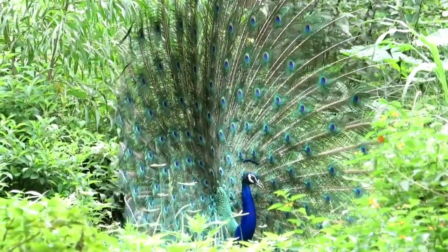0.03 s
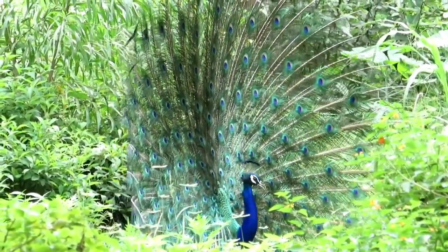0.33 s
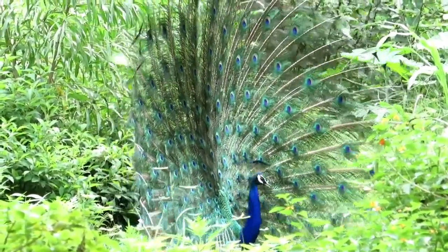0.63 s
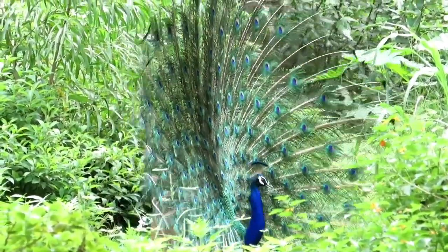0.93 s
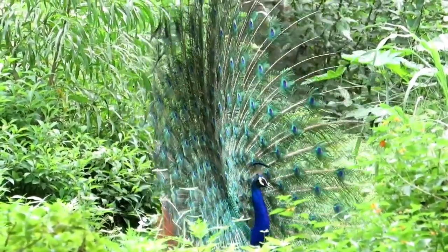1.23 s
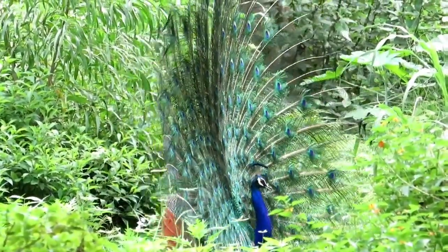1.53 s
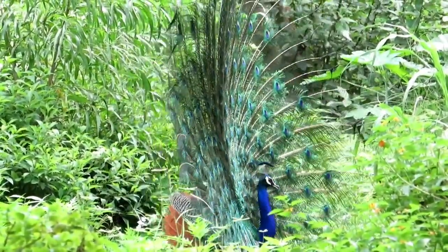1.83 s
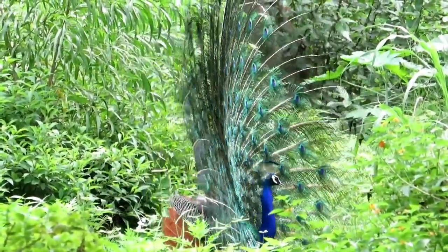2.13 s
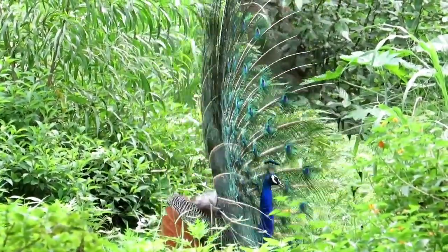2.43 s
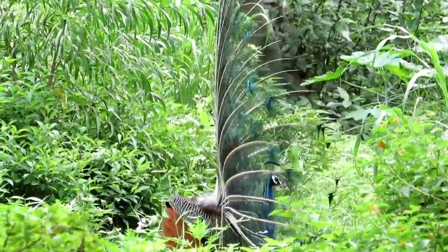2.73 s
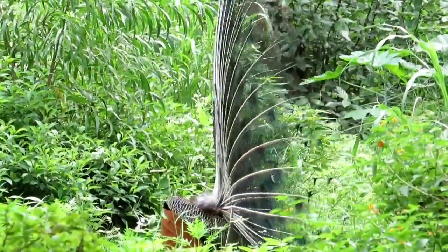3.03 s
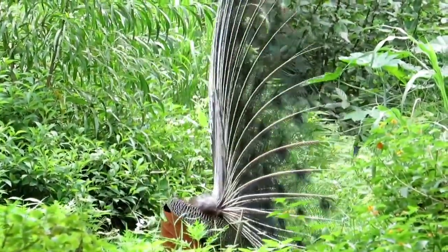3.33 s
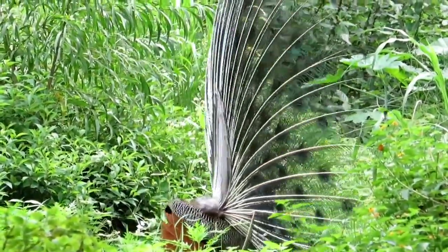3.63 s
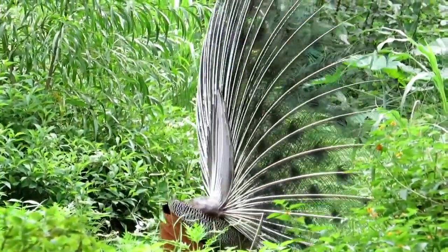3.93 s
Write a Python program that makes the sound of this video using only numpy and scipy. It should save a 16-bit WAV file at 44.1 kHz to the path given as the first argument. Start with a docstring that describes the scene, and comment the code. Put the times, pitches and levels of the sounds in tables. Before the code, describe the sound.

A bird repeats a soft rising hoot at an even pace in a park. Early on, a dry stalk scrapes and snaps close to the microphone. Small birds chirp farther off over distant traffic rumble and faint insects.

```python
"""Distant traffic rumbles and insects hiss around a single microphone in a park.
Small birds chirp farther off, and one hidden in the trees repeats a soft rising hoot, a nearly
pure tone, about two and a half times a second. Close to the microphone a dry stalk scrapes and
snaps, ringing briefly; later foliage brushes and the stalk ticks again. A faint tone wavers
far away in the second half. Trunks and leaves scatter short echoes."""
import sys
import numpy as np
from scipy import signal
from scipy.fft import rfft, irfft
from scipy.io import wavfile
from scipy.ndimage import uniform_filter1d

SR = 44100
rng = np.random.default_rng(int(sys.argv[2]) if len(sys.argv) > 2 else 0)


def to_wav(s):
    """Save 16-bit WAV."""
    ch = np.atleast_2d(s).T  # columns
    pcm = np.round(np.clip(ch, -1, 1) * 32767)  # PCM
    wavfile.write(sys.argv[1], SR, pcm.astype(np.int16))


N = 176400
T = np.arange(N) / SR

# spectrum of distant traffic and leaves: frequency_hz, relative_db
TRAFFIC_COLOUR = [(15, -23.5), (28, -41.5), (38, -4), (48, -4), (62, -1.5), (82, -1), (105, -9), (160, -12),
                  (230, -17.5), (330, -22), (450, -22), (800, -27.5), (1200, -25.5), (1500, -27.5),
                  (2000, -31.5), (2800, -34.5), (5000, -44), (7500, -44), (9000, -55.5), (12000, -66.5),
                  (15500, -65)]
# swells in the traffic's bass: time_s, boost_db
RUMBLE_SWELLS = [(0, -4), (.2, 1.5), (.42, 0.5), (.6, 5.5), (.78, 1.5), (.92, -6.5), (1.13, 5.5),
                 (1.45, -3.5), (1.72, 2), (1.83, 4.5), (2.1, -2), (2.3, 2), (2.6, -1), (2.85, -1),
                 (3.05, -1), (3.33, -6.5), (3.43, 5.5), (3.65, -2.5), (4, -3.5)]
# bands of insect hiss: centre_hz, width_hz, level_db
INSECT_BANDS = [(3740, 620, -61.5), (4640, 500, -65.5), (7260, 940, -78)]
# small birds' chirps, at the source: start_s, length_s, first_pitch_hz, last_pitch_hz, level_db
CHIRPS = [(.11, .07, 4730, 6000, -65), (0.554, .11, 4800, 3712, -59), (0.687, 0.061, 4180, 3940, -49),
          (0.768, .06, 4200, 3700, -53), (0.851, 0.1, 4700, 3750, -54.5), (1.082, 0.078, 4600, 3844, -52),
          (1.139, 0.086, 4800, 3660, -51.5), (1.244, 0.13, 5000, 3750, -54.5),
          (1.563, 0.14, 5020, 3880, -51.5), (1.881, .1, 4410, 3880, -48.5), (2.02, .06, 4400, 4860, -50.5),
          (2.088, .07, 4100, 3440, -56), (2.178, 0.079, 4900, 3771, -51), (2.27, 0.089, 5200, 4710, -54),
          (2.467, .085, 5100, 3710, -48.5), (2.706, 0.059, 4400, 4010, -50.5),
          (2.773, 0.067, 5000, 3630, -48), (3.053, .09, 5200, 3719, -51.5),
          (3.11, 0.071, 4600, 3790, -51.5), (3.21, 0.049, 3760, 3638, -55), (3.357, .11, 5100, 3640, -53.5),
          (3.518, 0.052, 4000, 3410, -52), (3.58, 0.065, 4400, 3580, -49.5),
          (3.661, 0.068, 4900, 3635, -49.5), (3.931, 0.059, 4400, 3622, -45), (3.967, .06, 4900, 3930, -55)]
# their thin whistles, at the source: start_s, length_s, pitch_hz, level_db
WHISTLES = [(1.96, 0.37, 7360, -68), (2.054, .12, 5850, -73), (2.292, 0.18, 6030, -56.5),
            (2.459, 0.2, 6040, -59), (2.75, 0.056, 5910, -55), (2.918, 0.12, 7070, -58),
            (3.084, .11, 7570, -61.5), (3.46, .13, 7500, -64), (3.821, 0.12, 7640, -67)]
# their faint sibilant notes, at the source: start_s, length_s, pitch_hz, level_db
SIBILANTS = [(.86, .08, 10060, -81), (1.12, 0.13, 9100, -76), (1.27, .1, 8430, -72), (1.6, .1, 9350, -77),
             (1.9, 0.099, 10170, -72), (2.5, 0.069, 10210, -86), (2.78, .1, 10100, -81),
             (3.08, 0.09, 10100, -71), (3.2, .16, 9070, -78), (3.38, 0.078, 10330, -77.5),
             (3.69, .08, 10200, -79)]
# distant twittering chorus: time_s, level_db
CHORUS_LEVEL = [(0, -65), (.5, -66), (.8, -59.5), (1.0, -78), (1.2, -60.5), (1.45, -77), (1.8, -58),
                (2.1, -55), (2.33, -51), (2.42, -60.5), (2.55, -52.5), (2.68, -55), (2.82, -52.5),
                (2.95, -63), (3.25, -76), (4, -84.5)]
# its spectrum: frequency_hz, relative_db
CHORUS_COLOUR = [(2500, -20), (3400, -6.5), (4700, 0.5), (5500, -4), (6200, -9.5), (6600, -14),
                 (8000, -20.5), (10000, -35), (15000, -40)]
# the hidden bird's hoots: crest_time_s, top_pitch_hz, crest_db, lead_in_db, crest_length_s
HOOTS = [(.288, 1109, -35, -44.5, 0.021), (.694, 1136, -35.5, -43, 0.026), (1.103, 1109, -34.5, -40, 0.02),
         (1.510, 1127, -34, -43, 0.032), (1.917, 1144, -30.5, -42, 0.027),
         (2.325, 1127, -30.5, -43.5, 0.027), (2.738, 1076, -33, -50, 0.0091),
         (3.159, 1116, -32, -45, 0.026), (3.578, 1117, -33, -48, 0.02), (3.994, 1120, -31.5, -48.5, 0.016)]
# pitch shape of every hoot: time_from_crest_s, share_of_top_pitch
HOOT_GLIDE = [(-.07, .63), (-.045, .62), (-.035, .82), (-.021, .9), (-.01, .985), (0, 1), (.011, .985),
              (.022, .89), (.036, .87)]
# reflections off the closest bushes: delay_s, gain_db
BUSH_ECHOES = [(.031, -17), (.046, -25), (.075, -29.5)]
# stalk scraping close to the microphone: time_s, level_db
SCRAPE_LEVEL = [(.246, -81), (.251, -49), (.261, -38), (.285, -46.5), (.298, -49), (.312, -39.5),
                (.321, -35), (.337, -60), (.353, -50), (.36, -37.5), (.39, -52.5), (.42, -49.5),
                (.435, -41), (.456, -71), (.5, -79)]
# spectrum of its scraping and splintering: frequency_hz, relative_db
SCRAPE_COLOUR = [(400, -16.5), (1200, -5.5), (2200, -6), (3200, 6.5), (5500, -0.5), (7500, 1), (9500, 0.5),
                 (12300, 7), (14500, -5), (16000, 3)]
# woody body of its creak: frequency_hz, relative_db
CREAK_COLOUR = [(700, -25), (1500, -8), (2100, 2.5), (2800, -16), (3900, -4), (5000, -9.5), (6200, -16),
                (7300, -4), (8500, -18.5), (15000, -30)]
# soft brushes of nearby foliage: middle_s, half_length_s, level_db
BRUSHES = [(0.721, 0.18, -70), (1.2, 0.1, -80), (1.66, .08, -65), (2.28, 0.06, -56), (2.56, .08, -72),
           (2.789, 0.083, -71), (3.055, 0.045, -66), (3.194, 0.17, -74)]
# their spectrum: frequency_hz, relative_db
BRUSH_COLOUR = [(2000, 6), (5000, 1), (8500, 2), (10500, -2.5), (12500, -2.5), (15500, -14)]
# close snaps of the stalk: start_s, ring_peak_db, brightness_0_to_1
SNAPS = [(.3158, -30, .6), (.3198, -26, .8), (.3563, -6.5, .7), (.3684, -17, .1), (3.0152, -34, .45),
         (3.0312, -35, .85)]
# the stalk's resonances: pitch_hz, relative_db, t60_s
STALK_MODES = [(853, -19.5, .008), (2042, -8.5, 0.0051), (2890, -11, 0.0065), (3930, -7, 0.0067),
               (5370, -3.5, .005), (7390, -10.5, .009), (10180, -1.5, 0.0034), (11450, 3.5, 0.0031),
               (13070, -5, 0.0096), (13500, -1, 0.0048)]
# far-off tone, at the source: time_s, pitch_hz, level_db
FAR_TONE = [(2.22, 1270, -76), (2.34, 1275, -52), (2.48, 1275, -60), (2.58, 1370, -54.5), (2.73, 1430, -55),
            (2.86, 1400, -72), (3.42, 1130, -83.5), (3.48, 1130, -44), (3.53, 1100, -71), (3.63, 1060, -62),
            (3.69, 1260, -54), (3.735, 1130, -45.5), (3.775, 1330, -47), (3.84, 1200, -67),
            (3.92, 1210, -53.5), (4, 1370, -47)]
# echo decay among the trees: frequency_hz, t60_s
TREE_DECAY = [(200, 0.43), (1100, 0.43), (4000, 0.21), (8000, 0.21), (14000, 0.201)]


def amp(db):
    """Decibels to gain."""
    return 10 ** (np.asarray(db) / 20)


def unit(x):
    """Scales to rms 1."""
    return x / np.sqrt(np.mean(x ** 2) + 1e-20)


def curve(points, t, column=1):
    """Joins the rows of a table with straight lines."""
    columns = np.transpose(points)
    return np.interp(t, columns[0], columns[column])


def over_hz(points, hz):
    """Reads a spectrum on a log-frequency axis."""
    knots_hz, values = np.transpose(points)
    return np.interp(np.log(hz + 1), np.log(knots_hz), values)


def colour(x, points):
    """Filters x by a spectrum, to rms 1."""
    gain = amp(over_hz(points, np.fft.rfftfreq(len(x), 1 / SR)))
    return unit(irfft(rfft(x) * gain, len(x)))


def drift(rate_hz):
    """Smooth random motion, rolling off above rate_hz."""
    size = N // 20
    lowpass = np.exp(-(np.fft.rfftfreq(size, 20 / SR) / rate_hz) ** 2)
    slow = irfft(rfft(rng.standard_normal(size)) * lowpass, size)
    return np.interp(T, T[::20], unit(slow))


def add(mix, start_s, sound):
    """Mixes a sound in at start_s."""
    part = mix[max(round(start_s * SR), 0):][:len(sound)]
    part += sound[:len(part)]


def phase(hz):
    """Running phase of a pitch curve."""
    return 2 * np.pi * np.cumsum(hz) / SR


def patches(shape, bins, frames):
    """A smooth random field over frequency and time, rms 1."""
    field = uniform_filter1d(rng.standard_normal(shape), bins, axis=0)
    return unit(uniform_filter1d(field, frames, axis=1))


def patchy_noise(depth_db, bins, frames):
    """Noise whose level drifts in patches of frequency and time."""
    spectrum = signal.stft(rng.standard_normal(N), SR, nperseg=512, noverlap=384)[2]
    spectrum *= amp(depth_db * patches(spectrum.shape, bins, frames))
    return signal.istft(spectrum, SR, nperseg=512, noverlap=384)[1][:N]


def distant_traffic(hum_hz=49.45):
    """Far traffic and leaves: patchy noise with a swelling rumble and a low hum."""
    hz, t, spectrum = signal.stft(rng.standard_normal(N), SR, nperseg=2048, noverlap=1536)
    patch_db = 1.39 * patches(spectrum.shape, bins=14, frames=9)
    swell_db = curve(RUMBLE_SWELLS, t) + 2.87 * np.interp(t, T, drift(6.18))
    bass = np.exp(-(hz / 130) ** 2)[:, None]
    spectrum *= amp(patch_db + swell_db * bass)
    noise = signal.istft(spectrum, SR, nperseg=2048, noverlap=1536)[1][:N]
    hum = unit(np.sin(phase(hum_hz * (1 + 0.0079 * drift(1.9)))))
    return amp(-40.5) * colour(noise, TRAFFIC_COLOUR) + amp(-47) * hum


def insects(shimmer_db=3.6):
    """Insects in the park: steady narrow bands of hiss that shimmer."""
    out, hz = np.zeros(N), np.fft.rfftfreq(N, 1 / SR)
    for centre_hz, width_hz, db in INSECT_BANDS:
        level = amp(db + shimmer_db * drift(12))
        band = np.exp(-2 * ((hz - centre_hz) / width_hz) ** 2)
        out += level * unit(irfft(rfft(rng.standard_normal(N)) * band, N))
    return out


def small_birds(direct_db=-6, echo_db=-4.5, flutter_db=2.5):
    """Farther off, slurred chirps and thin notes blur in the trees over a noisy twittering chorus."""
    calls = np.zeros(N)
    for start_s, length_s, first_hz, last_hz, db in CHIRPS:
        progress = np.linspace(0, 1, round(length_s * SR))
        hz = last_hz + (first_hz - last_hz) * (1 - progress) ** 1.7  # settles on the last pitch
        hz *= 1 + .015 * drift(300)[:len(hz)]
        envelope = amp(db) * np.sqrt(abs(np.sin(np.pi * progress)))
        flutter = amp(flutter_db * drift(180)[:len(hz)])
        add(calls, start_s, np.sqrt(2) * envelope * flutter * np.sin(phase(hz)))
    calls += held_notes(WHISTLES, jitter=0.0192) + held_notes(SIBILANTS, jitter=0.031)
    chorus_level = amp(curve(CHORUS_LEVEL, T) + 1.7 * drift(25))
    chorus = chorus_level * colour(patchy_noise(depth_db=4, bins=4, frames=22), CHORUS_COLOUR)
    return amp(direct_db) * calls + amp(echo_db) * tree_echoes(calls) + chorus


def tree_echoes(x, build_s=0.0075):
    """Trunks and leaves scatter sound back to the microphone; the treble dies first."""
    hz, t, spectrum = signal.stft(rng.standard_normal(SR), SR, nperseg=256)
    decay = amp(-60 * t / over_hz(TREE_DECAY, hz)[:, None])
    tail = signal.istft(spectrum * decay, SR)[1]
    tail *= np.minimum(np.arange(len(tail)) / SR / build_s, 1)
    return signal.fftconvolve(x, tail / np.linalg.norm(tail))[:len(x)]


def hooting_bird(overtone_db=-34, echo_db=-15.5):
    """A nearly pure tone from the trees: a husky low lead-in slides up to a crest and drops away."""
    out, t = np.zeros(N), np.arange(-.08, .06, 1 / SR)  # t = 0 at the crest
    lead_in = np.exp(-((t + 0.0506) / .013) ** 2)
    slide = amp(-9.5) * np.exp(-((t + 0.0019) / 0.033) ** 4)
    jitter = 0.0027 + 0.071 * lead_in  # unsteady pitch makes the lead-in husky
    for crest_s, top_hz, crest_db, lead_db, length_s in HOOTS:
        crest = np.exp(-0.78 * abs(2 * t / length_s) ** 6.7)
        angle = phase(top_hz * curve(HOOT_GLIDE, t) * (1 + jitter * drift(330)[:len(t)]))
        level = amp(crest_db) * np.hypot(crest, slide)
        level += amp(lead_db + 1.5 * drift(120)[:len(t)]) * lead_in
        tone = np.sin(angle) + amp(overtone_db) * np.sin(2 * angle)
        call = np.pad(np.sqrt(2) * level * tone, (0, SR // 2))
        add(out, crest_s + t[0], call + bush_echoes(call) + amp(echo_db) * tree_echoes(call))
    return out


def bush_echoes(x, blur_s=0.0043):
    """A few smeared reflections from the closest bushes."""
    t = np.arange(SR // 10) / SR
    taps = sum(amp(db) * unit(np.exp(-((t - delay_s) / blur_s) ** 2) * rng.standard_normal(len(t)))
               for delay_s, db in BUSH_ECHOES)
    return signal.fftconvolve(x, taps / np.sqrt(len(t)))[:len(x)]


def close_rustle(grain_db=4.5, creak_s=.262, echo_db=-7):
    """By the microphone the stalk creaks and scrapes in dry grains; later, foliage brushes softly."""
    grains = patchy_noise(depth_db=4.5, bins=7, frames=9) * amp(grain_db * drift(700))
    scrape = amp(curve(SCRAPE_LEVEL, T)) * colour(grains, SCRAPE_COLOUR)
    brush_level = sum(amp(db) * np.exp(-((T - middle_s) / half_s) ** 2)
                      for middle_s, half_s, db in BRUSHES)
    brush = brush_level * colour(rng.standard_normal(N) * amp(2.5 * drift(450)), BRUSH_COLOUR)
    creak_level = amp(-42) * np.exp(-((T - creak_s) / .014) ** 4)
    stalk = scrape + creak_level * colour(rng.standard_normal(N), CREAK_COLOUR)
    return stalk + amp(echo_db) * tree_echoes(stalk) + brush


def stalk_snaps(bright_hz=6500, splinter_s=0.015, echo_db=-10.5):
    """Each close snap rings the stalk for a few milliseconds and sheds a spray of splintering."""
    out, t = np.zeros(N), np.arange(SR // 10) / SR
    for start_s, db, brightness in SNAPS:
        ring = np.zeros(len(t))
        for hz, mode_db, t60_s in STALK_MODES:
            weight = brightness if hz > bright_hz else 1 - brightness / 2
            ring += weight * amp(mode_db - 60 * t / t60_s) * np.sin(2 * np.pi * (hz * t + rng.random()))
        ring *= np.minimum(t / .00015, 1)
        spray_level = brightness * amp(-16.5) * np.exp(-t / splinter_s)
        spray = spray_level * colour(rng.standard_normal(len(t)), SCRAPE_COLOUR)
        add(out, start_s, amp(db) * (ring / abs(ring).max() + spray))
    return out + amp(echo_db) * tree_echoes(out)


def held_notes(notes, jitter):
    """Small birds' short high notes, each on one trembling pitch."""
    out = np.zeros(N)
    for start_s, length_s, hz, db in notes:
        progress = np.linspace(0, 1, round(length_s * SR))
        envelope = amp(db) * np.sqrt(abs(np.sin(np.pi * progress)))
        tremble = 1 + jitter * drift(370)[:len(progress)]
        add(out, start_s, np.sqrt(2) * envelope * np.sin(phase(hz * tremble)))
    return out


def far_tone(direct_db=-4, echo_db=-7):
    """A faint gliding tone far from the microphone, blurred by the trees."""
    hz = curve(FAR_TONE, T) * (1 + .012 * drift(86.7))
    tone = np.sqrt(2) * amp(curve(FAR_TONE, T, column=2)) * np.sin(phase(hz))
    return amp(direct_db) * tone + amp(echo_db) * tree_echoes(tone)


def scene():
    """The park, near and far, at one microphone."""
    calls = hooting_bird() + small_birds() + far_tone()
    return (calls + stalk_snaps() + close_rustle() + insects() + distant_traffic())[None]


def record(dry):
    """The recorder's band limit: a steep low-pass at 15.7 kHz."""
    lowpass = signal.firwin(301, 15700, window=("kaiser", 8), fs=SR)
    return signal.oaconvolve(dry, lowpass[None], "same")


dry = scene()
out = record(dry)
to_wav(out)
```